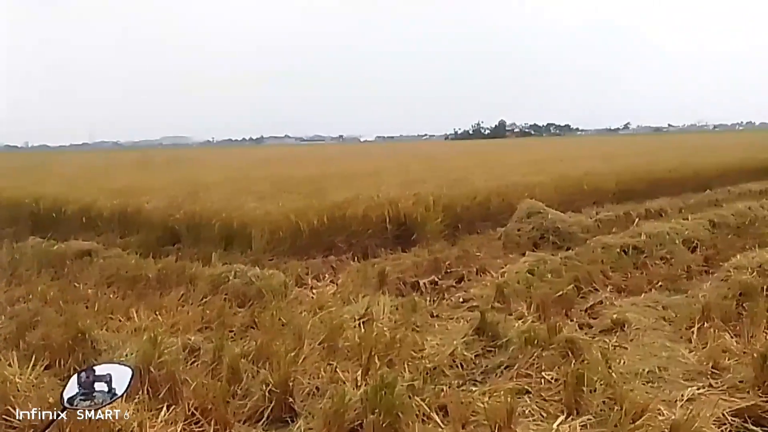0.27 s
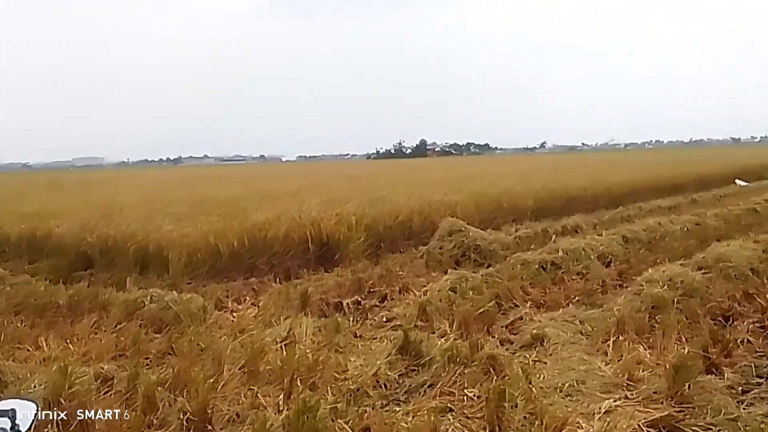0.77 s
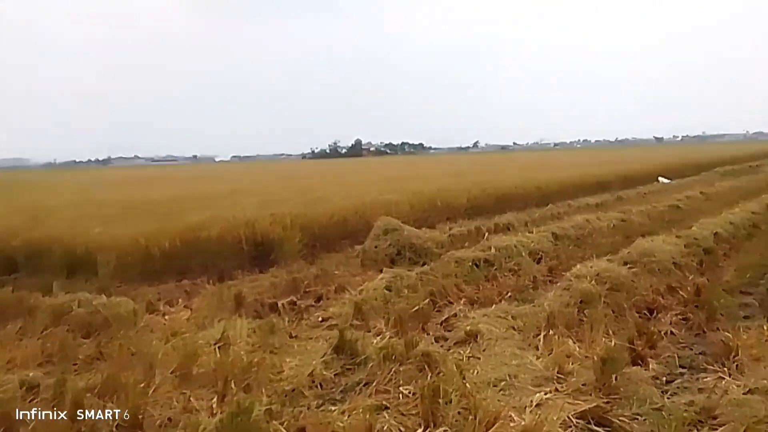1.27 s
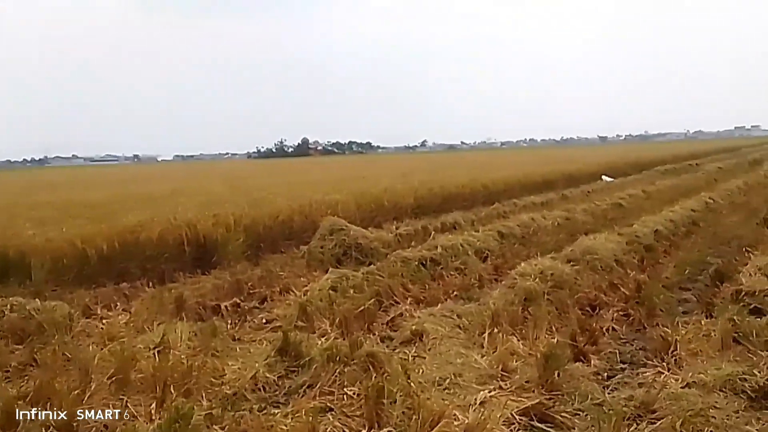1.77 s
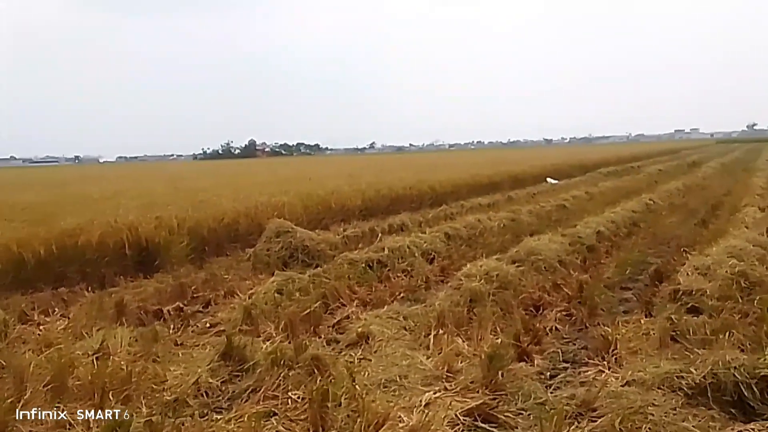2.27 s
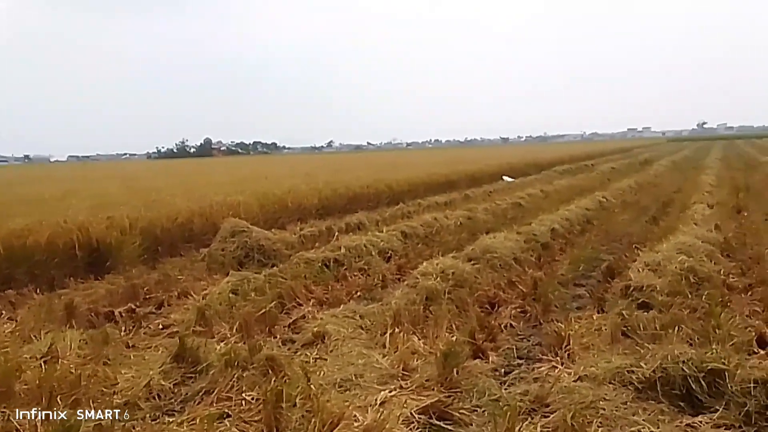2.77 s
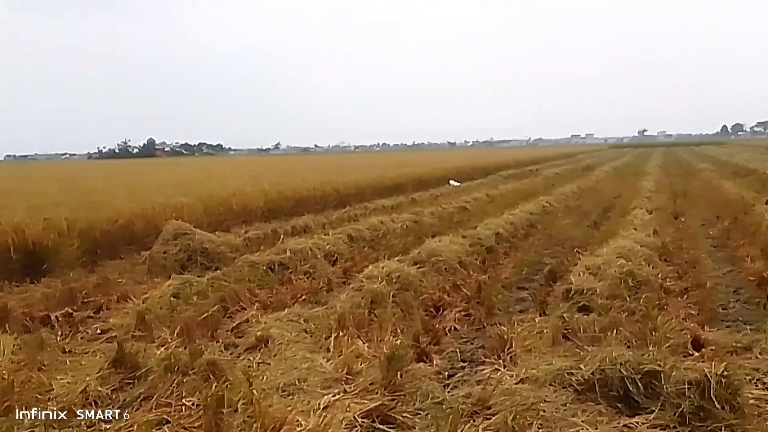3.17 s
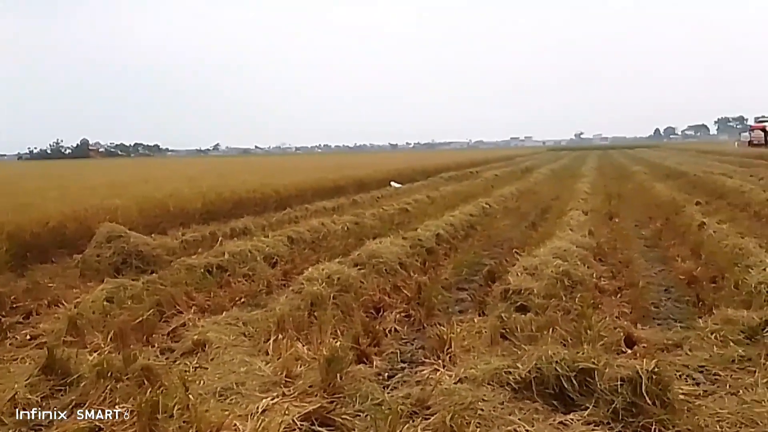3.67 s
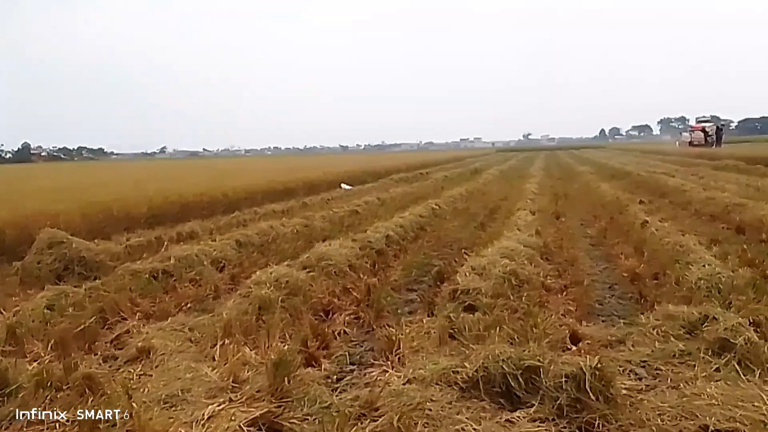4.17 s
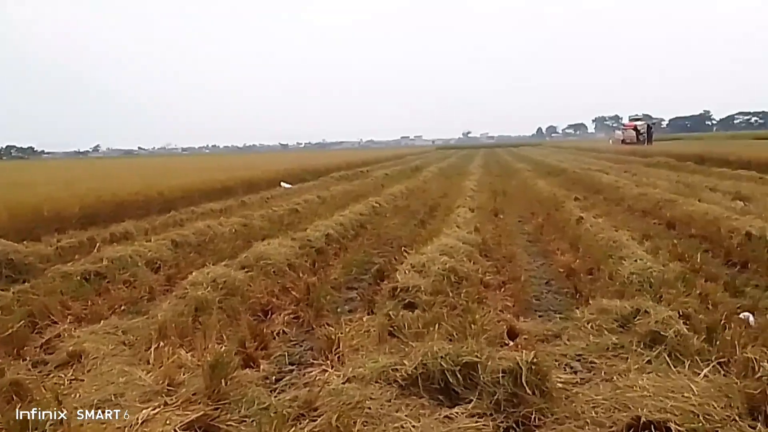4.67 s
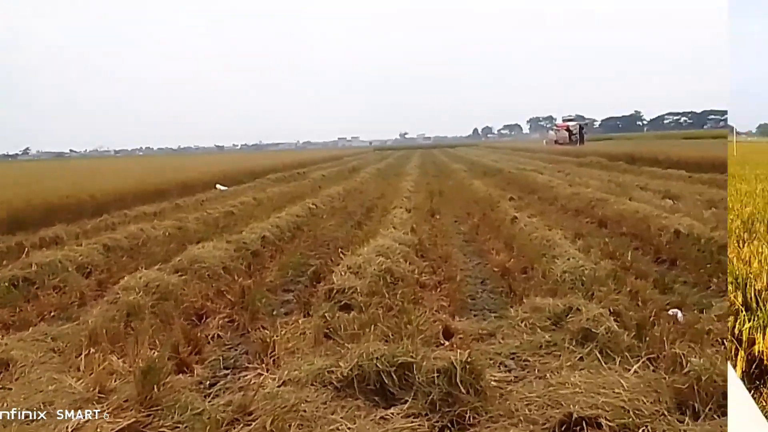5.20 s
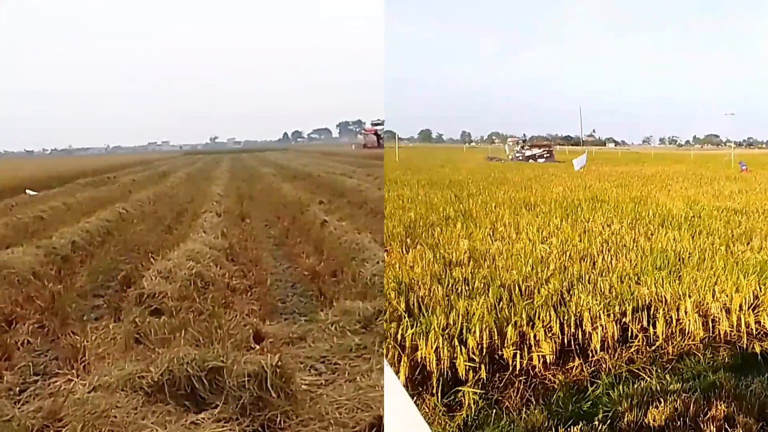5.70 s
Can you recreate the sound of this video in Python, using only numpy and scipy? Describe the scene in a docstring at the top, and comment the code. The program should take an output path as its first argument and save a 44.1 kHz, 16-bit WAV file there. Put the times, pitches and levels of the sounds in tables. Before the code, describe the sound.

In an open, echo-free rice field, a small single-cylinder engine, probably a motorbike's, putters close to the microphone at about 33 to 36 beats a second. From 0 to 1.5 seconds it is loudest: hollow low thumps with gas rasp, metallic clatter, sharp ticks and a ringing tin silencer, plus a few harder barks and brief clinks. Ticks thin out after about 1.6 seconds. From 3 seconds the engine slows and softens, its beats deeper, ragged and separate, dropping to around 20 a second after 4 seconds and 15 to 17 near the end, almost gone. A distant harvester's dull drone and thin hiss continue underneath, more exposed late, ebbing at the end. Tiny paired bird chips near 1.8, 3.1, 3.4, 4.1 and 5.5 to 5.8 seconds are very faint, as are brief high buzzy patches. A loose knock swells around 4.7. One dry close click lands at 5.2, then straw crackles from 5.4 to 5.75.

```python
"""A small single-cylinder engine, probably a motorbike's, putters in an open rice field and winds down towards idle.
From the start each firing rings the silencer, rasps, clatters and ticks, and a far combine harvester drones.
Early on some firings bark and a loose part clinks; the thump sinks in pitch and rings longer as the engine slows.
Later a bird chips in pairs, faint narrow patches of 8 kHz noise come and go and a slow knock swells;
then comes one dry click, and straw crackles. Impulse responses, shaped noise and decaying sines make the sounds."""
import sys
import numpy as np
from scipy import signal
from scipy.fft import rfft, irfft, next_fast_len
from scipy.io import wavfile
from scipy.ndimage import map_coordinates

SR = 44100
rng = np.random.default_rng(int(sys.argv[2]) if len(sys.argv) > 2 else 0)


def master_out(mix):
    """Clip the mix to full scale and print it as 16-bit PCM to the path in sys.argv[1]."""
    frames = np.transpose(np.atleast_2d(mix))
    ceiling = np.clip(frames, -1, 1)
    pcm = np.round(ceiling * 32767).astype(np.int16)
    wavfile.write(sys.argv[1], SR, pcm)


N = 261954

# Engine speed: time_s, firing_rate_hz
FIRING_RATE = [(0.0, 33.22), (0.15, 35.19), (0.44, 32.37), (0.72, 35.5), (0.79, 33.93), (1.17, 36.23),
               (1.54, 34.77), (1.83, 36.46), (2.16, 33.67), (2.48, 32.74), (2.74, 34.64), (2.95, 31.0),
               (3.06, 30.98), (3.37, 27.55), (3.55, 23.37), (3.75, 25.51), (3.98, 24.8), (4.21, 19.72),
               (4.61, 19.71), (4.91, 24.12), (5.15, 20.01), (5.68, 15.13), (5.94, 16.94)]
# Throttle: time_s, opening (2 pulling, 1 eased, 0 shut; more than 2 only strengthens the shell ring)
THROTTLE = [(0, 3.5), (1.2, 1), (1.9, 2), (2.9, 1.52), (3.35, 0.46), (4.45, 0.15), (4.85, 0.17),
            (5.2, 0.02), (5.94, 0.5)]
# Single firings that are weak or hard: time_s, strength_db
ODD_FIRINGS = [(0.05, -0.5), (0.164, 4.5), (0.195, -6), (0.252, 2.5), (0.39, -3.5), (0.668, 4), (0.783, 2),
               (1.068, 4), (1.2, -1.5), (1.292, 3), (1.32, -1.5), (1.404, 3), (1.433, -4), (2.0, 3.5),
               (2.05, -10), (2.262, 2.5), (2.322, -2), (2.35, 2), (2.6, -8), (3.22, -10), (3.325, 3.5),
               (3.48, -2.5), (3.52, -2.5), (3.76, -7), (3.8, 3), (3.92, -13), (4.135, -1.5), (4.23, 0),
               (4.63, -3), (4.685, 2), (4.73, 0.5), (5.23, 7), (5.335, -5), (5.39, 3.5), (5.44, 8.5),
               (5.5, -11), (5.88, 4)]

# Silencer response at each throttle setting: frequency_hz, relative_level_db
SILENCER_SHUT = [(30, -57), (60, -45), (100, -16), (135, -5), (168, -15.5), (205, -19.5), (245, 6.5),
                 (285, 0.5), (335, -32), (450, -49.5), (900, -61), (2000, -110)]
SILENCER_EASED = [(30, -76.5), (60, -53.5), (100, -26.5), (138, -14), (162, -20.5), (200, -9), (238, 5),
                  (272, -5.5), (305, 4.5), (340, -13), (400, -27), (700, -31.5), (2000, -100)]
SILENCER_PULLING = [(30, -46), (60, -43.5), (100, -24), (140, -17), (163, -21.5), (205, -3), (245, 1.5),
                    (275, -0.5), (315, 2.5), (350, -14), (400, -25.5), (700, -31.5), (2000, -100)]
# Drift of the silencer's resonances: time_s, pitch_factor
SILENCER_TUNING = [(0, 1.072), (1.1, 1.015), (2.4, 0.95), (3.2, 0.99), (3.5, 0.926), (4.3, 0.93), (4.85, 1),
                   (5.3, 0.994)]
# Silencer loudness before each layer's offset: time_s, level_db
THUMP_LEVEL = [(0.02, -38), (1.58, -40), (1.61, -43.5), (2.91, -45), (2.94, -48.5), (3.49, -45),
               (3.52, -53), (3.7, -48), (4.14, -49.5), (4.18, -60), (4.42, -52.5), (4.51, -74),
               (4.57, -56.5), (4.69, -51.5), (4.87, -48.5), (5.1, -55), (5.15, -67), (5.92, -69.5)]

# Gas rasp spectrum: frequency_hz, relative_density_db_per_hz
RASP_SPECTRUM = [(150, -38), (320, 6), (450, 1.5), (570, -1), (670, 9), (770, 0.5), (900, 0), (1030, -11),
                 (1200, -11.5), (1600, -40.5), (2500, -45)]
# Gas rasp loudness before its offset: time_s, level_db
RASP_LEVEL = [(0.02, -67), (0.15, -56), (0.56, -64.5), (0.76, -60.5), (1.75, -60.5), (2.12, -61),
              (2.45, -75.5), (2.57, -65.5), (3.21, -64), (3.4, -74.5), (4.92, -78.5), (5.89, -86),
              (5.92, -73)]
RASP_PITCH_FIRST, RASP_PITCH_LAST, RASP_SINK_S = 1.43, 1, 2.7  # pitch factors, and the time to sink
# Metal clatter spectrum: frequency_hz, relative_density_db_per_hz
CLATTER_SPECTRUM = [(900, -18), (1350, -9.5), (1650, -10.5), (1880, 1.5), (2030, 7.5), (2250, 4.5),
                    (2500, 5), (2750, 1.5), (3000, 1.5), (3250, -1), (3530, -2), (3820, -7), (4080, -8),
                    (5000, -25.5), (9000, -26.5)]
# Metal clatter loudness: time_s, level_db
CLATTER_LEVEL = [(0, -66), (0.25, -66.5), (0.5, -71), (0.72, -70), (0.88, -70), (1.05, -67), (1.2, -70.5),
                 (1.45, -68.5), (1.6, -70), (1.85, -67), (2.2, -70), (2.85, -73.5), (3.0, -76), (3.25, -74),
                 (3.55, -76), (3.9, -76.5), (4.3, -78.5), (4.8, -78), (5.2, -83.5), (5.94, -83)]
# Sharp tick spectrum: frequency_hz, relative_density_db_per_hz
TICK_SPECTRUM = [(1500, -9), (2600, -3.5), (3450, 5.5), (3850, -14), (4500, -4.5), (5150, -16.5),
                 (5800, -6), (6300, -4.5), (7050, 1), (8000, -4), (9000, -10.5), (9800, -11.5), (10600, -5),
                 (12500, -19), (15500, -29)]
# Tick loudness before its offset: time_s, level_db
TICK_LEVEL = [(0, -77), (0.22, -75.5), (0.25, -69.5), (0.45, -70), (0.72, -69), (0.86, -73), (0.94, -70.5),
              (1.05, -74.5), (1.27, -71.5), (1.4, -77), (1.49, -74), (1.53, -69), (1.6, -77), (1.66, -84),
              (1.72, -88), (1.84, -85), (1.93, -88), (1.98, -80), (2.03, -82), (2.08, -87), (2.18, -83),
              (2.265, -79.5), (2.32, -84), (2.36, -82.5), (2.5, -83), (2.57, -94), (2.66, -85), (2.78, -95),
              (2.84, -87), (2.95, -89), (3.08, -86), (3.13, -81.5), (3.19, -83), (3.26, -99)]
# Modes of the silencer's tin shell: frequency_hz, relative_level_db
SHELL_MODES = [(985, 0), (1197, -6), (1712, -5), (1813, -3), (2010, -9), (2471, -12), (3500, -12)]

# Far harvester and open air: frequency_hz, relative_density_db_per_hz
HARVESTER_SPECTRUM = [(25, -18), (55, -21), (115, 6), (170, 2), (240, 14), (380, -20), (560, -9),
                      (840, 3.5), (1060, -9), (1230, -9.5), (1520, -18.5), (1850, -8), (2200, -16.5),
                      (2600, -7), (2950, -12), (3200, -25.5), (3600, -24.5)]
# Harvester loudness before its drift and the air's absorption: time_s, level_db
HARVESTER_LEVEL = [(0, -67.5), (3.3, -64), (3.5, -66.5), (3.8, -64.5), (4.4, -65.5), (4.9, -63.5),
                   (5.15, -65.5), (5.35, -67.5), (5.55, -66.5), (5.85, -70.5)]
# Hiss loudness: time_s, level_db
HISS_LEVEL = [(0, -81.5), (3, -83.5), (5.1, -83.5), (5.5, -87), (5.94, -86)]

# Harder firings that bark: start_s, level_db
BARKS = [(0.109, -48), (0.165, -33.5), (0.251, -52), (0.67, -50), (0.697, -48), (0.784, -46.5),
         (0.927, -57), (1.069, -48), (1.096, -66), (1.406, -41), (1.433, -58)]
# Bark spectrum: frequency_hz, relative_density_db_per_hz
BARK_SPECTRUM = [(250, -12), (500, 11.5), (700, 4), (950, 8.5), (1250, 3), (1550, -6), (1800, -1),
                 (2600, -3), (3600, -6), (5000, -40), (12000, -63)]
# Clinks of a loose metal part: start_s, peak_db, pitch_hz
CLINKS = [(0.116, -44.5, 1000), (0.164, -38.5, 1200), (0.25, -42, 1130), (0.991, -50.5, 950),
          (1.098, -48.5, 1030), (1.405, -46, 810), (2.313, -53.5, 634)]
# Chips of a small far bird, in pairs: start_s, peak_db, pitch_hz
CHIPS = [(1.832, -75, 7950), (1.843, -74, 7640), (3.132, -76, 7640), (3.143, -72, 7450), (3.368, -79, 7700),
         (3.379, -78, 7850), (4.085, -81, 7750), (4.097, -77, 7600), (5.526, -80, 7350), (5.537, -82, 7150),
         (5.754, -81, 7270), (5.765, -78, 7010)]
# Faint narrow noise patches near 8 kHz: start_s, length_s, level_db
NOISE_PATCHES = [(3.41, 0.18, -93), (4.61, 0.23, -91), (4.935, 0.17, -90), (5.76, 0.19, -96)]
# Narrow noise band near 8150 Hz: frequency_hz, relative_density_db_per_hz
PATCH_SPECTRUM = [(7000, -62), (7850, -2), (8150, 9), (8450, -3), (8800, -2), (9600, -60)]

# Spells of loose knock at low speed: start_s, rise_s, fall_s, peak_db
KNOCK_SPELLS = [(4.45, 0.22, 0.57, -72), (4.8, 0.18, 0.17, -85), (5.5, 0.22, 1.8, -82)]
KNOCK_RANGE_DB = 25  # a spell rises from and sinks to this far under its peak
# Slow knock spectrum: frequency_hz, relative_density_db_per_hz
KNOCK_SPECTRUM = [(1500, -31), (3150, -16), (3370, 13.5), (3720, 1), (3860, 13), (4100, -12), (4400, 7),
                  (4950, -21), (5450, -5.5), (6000, -15), (7300, -5), (8500, -25), (11500, -13),
                  (15000, -18)]
# Dry click response: frequency_hz, relative_level_db
CLICK_RESPONSE = [(800, -22), (1600, -1), (2400, 6), (3000, -1.5), (3900, -17), (4800, -38), (12000, -43)]
# Crackles of dry straw: start_s, level_db
CRACKLES = [(5.435, -68), (5.468, -76), (5.52, -71), (5.569, -71), (5.589, -68), (5.622, -68), (5.657, -71),
            (5.717, -72), (5.734, -73)]
# Straw spectrum: frequency_hz, relative_density_db_per_hz
STRAW_SPECTRUM = [(1200, -30), (2000, -2), (2400, 2), (3000, -1), (4000, -10), (6000, -40)]

TOP_HZ = 15650  # upper band limit of the whole sound


def amp(db):
    """Decibel law: 20 dB is a factor of ten in amplitude."""
    return 10 ** (np.asarray(db) / 20)


def unit(x):
    """Normalisation: x at rms 1."""
    return x / np.sqrt(np.mean(x ** 2) + 1e-20)


def curve(rows):
    """Linear interpolation: one value per sample from (time, value) rows."""
    time_s, values = np.transpose(rows)
    return np.interp(np.arange(N) / SR, time_s, values)


def gain(points, size):
    """Frequency response: gain of (Hz, dB) points on an FFT grid, joined on a log axis."""
    hz, db = np.transpose(points)
    grid_hz = np.fft.rfftfreq(size, 1 / SR)
    return amp(np.interp(np.log(grid_hz + 1), np.log(hz), db))


def noise(points, patchy_db=0, size=5, count=20):
    """Spectral shaping: noise of rms 1 with shifting resonances, size bins wide and count frames long."""
    spectrum = signal.stft(rng.standard_normal(N), nperseg=2048)[2]
    smoother = np.outer(np.hanning(size), np.hanning(count))
    patches = unit(signal.fftconvolve(rng.standard_normal(spectrum.shape), smoother, "same"))
    spectrum = spectrum * gain(points, size=2048)[:, None] * amp(patchy_db * patches)
    return unit(signal.istft(spectrum, nperseg=2048)[1][:N])


def ring(points, swell=0, size=8192):
    """Impulse response of energy 1 centred on the blow: swell 0 is minimum phase, 1 zero phase."""
    cepstrum = irfft(np.log(gain(points, size) + 1e-7))
    # weighting the two halves of the cepstrum moves energy between after and before the blow
    cepstrum[1:size // 2] *= 2 - swell
    cepstrum[size // 2 + 1:] *= swell
    response = np.fft.fftshift(irfft(np.exp(rfft(cepstrum))))
    return response / np.linalg.norm(response)


def wobble(rate):
    """Slow random modulation: a smooth curve through rate random knots a second."""
    knots = rng.standard_normal(int(N * rate / SR) + 4)
    return map_coordinates(knots, [np.arange(N) * rate / SR])


def glide(x, speed):
    """Resampling: x played at a moving speed, so that its resonances slide."""
    return unit(map_coordinates(x, [np.cumsum(speed)], mode="wrap"))


def add(track, start, sound):
    """Superposition: mix a sound into the track from sample start on."""
    at = int(start) + np.arange(len(sound))
    inside = (at >= 0) & (at < N)
    track[at[inside]] += sound[inside]


def pings(rows, attack, decay, rough):
    """Damped oscillation: each short sound is one sine whose phase wanders slightly."""
    t, out = np.arange(SR // 20) / SR, np.zeros(N)
    envelope = (1 - np.exp(-t / attack)) ** 2 * np.exp(-t / decay)
    envelope = envelope / envelope.max()
    for start_s, peak_db, pitch_hz in rows:
        drift = rough * np.cumsum(rng.standard_normal(len(t)))
        add(out, start_s * SR, amp(peak_db) * envelope * np.sin(2 * np.pi * pitch_hz * t + drift))
    return out


def puffs(fires, decay, scatter_db, between, delay, force_db=0):
    """Amplitude modulation: a burst at each firing over a steady share between them, at rms 1."""
    t, envelope = np.arange(SR // 10) / SR, np.zeros(N)
    burst = np.exp(-t / decay) * (1 - np.exp(-t / 0.001))
    # the scatter also offsets all bursts against the steady share, by -3 times scatter_db on average
    size_db = force_db + scatter_db * (2 * rng.random(len(fires)) - 4.0)
    for start, size in zip(fires, amp(size_db)):
        add(envelope, start + delay * SR, size * burst)
    return unit(envelope + between)


def firings(rate):
    """Phase accumulation: a firing, as a sample index, at each whole cycle of the summed rate."""
    return np.flatnonzero(np.diff(np.floor(np.cumsum(rate) / SR + .4)))


def strengths(fires, scatter_db):
    """Cyclic variation of combustion: strengths in dB, nearly even, a few set weak or hard."""
    force_db = scatter_db * rng.standard_normal(len(fires))
    for time_s, db in ODD_FIRINGS:
        force_db[np.argmin(abs(fires - time_s * SR))] = db
    return force_db


def thumps(fires, rate, throttle, force_db, detune, lag):
    """Impulse excitation of a resonator: each firing rings the silencer, slightly varied in pitch."""
    voices = np.array([ring(SILENCER_SHUT, swell=0.36), ring(SILENCER_EASED, swell=0.061),
                       ring(SILENCER_PULLING, swell=0.11)])
    tuning = curve(SILENCER_TUNING)
    out, half = np.zeros(N), voices.shape[1] // 2
    n = np.arange(-half, half)
    for start, size_db, pitch in zip(fires, force_db, rng.standard_normal(len(fires))):
        # crossfade between the two nearest throttle settings
        distance = abs(np.clip(throttle[start], 0, 2) - np.arange(len(voices)))
        shares = np.maximum(1 - distance, 0)
        stretch = tuning[start] * (1 + detune * pitch)
        thump = map_coordinates(shares @ voices, [half + n * stretch])
        # slower firings each carry more of a second's energy
        energy = np.sqrt(SR / rate[start]) / np.linalg.norm(thump)
        # with the throttle shut the weak charge burns late
        late = lag * shares[0] - .0021
        add(out, start - half + late * SR, amp(size_db) * energy * thump)
    return out


def churn(thump_db):
    """Flow noise: turbulent gas keeps the silencer sounding between firings."""
    return amp(thump_db - 13) * noise(SILENCER_EASED)


def gas_rasp(fires, force_db):
    """Pulsed jet noise: gas rasps at each firing, its resonances sinking at first."""
    pitch = np.interp(np.arange(N) / SR, [0, RASP_SINK_S], [RASP_PITCH_FIRST, RASP_PITCH_LAST])
    gas = glide(noise(RASP_SPECTRUM, patchy_db=2.5, size=4, count=10), pitch)
    pulses = puffs(fires, decay=0.008, scatter_db=1.5, between=1.0, delay=0.00024,
                   force_db=1.9 * force_db)
    return amp(curve(RASP_LEVEL) + 0.13) * gas * pulses


def metal_clatter(fires, force_db):
    """Contact noise: many small metal contacts follow each firing."""
    contacts = amp(2.0 * wobble(350))
    metal = unit(noise(CLATTER_SPECTRUM, patchy_db=4.5, size=6) * contacts)
    pulses = puffs(fires, decay=0.0065, scatter_db=1.5, between=0.31, delay=0.0021,
                   force_db=1.04 * force_db)
    return amp(curve(CLATTER_LEVEL)) * metal * pulses


def sharp_tick(fires, force_db):
    """Short impact: a brief treble burst spreads over a wide band at each firing."""
    snap = noise(TICK_SPECTRUM, patchy_db=1.0, size=22, count=4)
    pulses = puffs(fires, decay=0.0021, scatter_db=3.0, between=0.013, delay=0.00078,
                   force_db=0.38 * force_db)
    return amp(curve(TICK_LEVEL) + 1.0) * snap * pulses


def shell_ring(fires, throttle, t60):
    """Modal vibration: firings shake the tin shell's modes at new strengths, loudest under load."""
    t, out = np.arange(SR // 2) / SR, np.zeros(N)
    modes = np.array([amp(db - 60 * t / t60) * np.sin(2 * np.pi * hz * t) for hz, db in SHELL_MODES])
    for start, mode_strengths in zip(fires, rng.standard_normal((len(fires), len(modes)))):
        add(out, start, mode_strengths @ modes)
    return amp(-100 + 10.2 * throttle) * unit(out)


def burble(fires, throttle, thump_db, force_db):
    """Noise excitation: off the throttle the charge burns raggedly and blurs each beat."""
    shut = np.clip(1 - throttle, 0, 1)
    pulses = puffs(fires, decay=0.012, scatter_db=1.0, between=0.35, delay=0.00045, force_db=force_db)
    flame = rng.standard_normal(N) * pulses
    return shut ** 2 * amp(thump_db - 6.5) * signal.fftconvolve(flame, ring(SILENCER_SHUT), "same")


def engine():
    """Periodic excitation: the crank times every layer of the engine."""
    rate, throttle, thump_db = curve(FIRING_RATE), curve(THROTTLE), curve(THUMP_LEVEL)
    fires = firings(rate)
    force_db = strengths(fires, scatter_db=1.2)  # a hard firing also rasps, clatters and ticks harder
    thump = thumps(fires, rate, throttle, force_db, detune=0.014, lag=0.0043)
    silencer = amp(thump_db - 2.07) * thump + churn(thump_db)
    silencer = silencer + burble(fires, throttle, thump_db, force_db)
    gas = gas_rasp(fires, force_db)
    metal = metal_clatter(fires, force_db) + sharp_tick(fires, force_db) + loose_knock(fires)
    return silencer + gas + metal + shell_ring(fires, throttle, t60=0.14)


def field():
    """Absorption over distance: the harvester's dulled drone drifts over a thin hiss; both ebb at the end."""
    air = signal.butter(4, 3900, fs=SR, output="sos")  # distance takes the treble
    far = signal.sosfilt(air, noise(HARVESTER_SPECTRUM, patchy_db=0.5, size=7))
    drone = amp(curve(HARVESTER_LEVEL) + 1.2 * wobble(5.9)) * far
    hiss = noise([(100, -2.0), (3500, -3.5), (5200, -8.0), (8000, -1.0), (12000, -1.5), (15500, -1.0)])
    return drone + amp(curve(HISS_LEVEL)) * hiss


def barks(decay, tail, tail_db):
    """Two-stage decay: a harder firing barks out of the pipe and leaves a short ring."""
    t, envelope = np.arange(SR // 10) / SR, np.zeros(N)
    decays = np.exp(-t / decay) + amp(tail_db) * np.exp(-t / tail)
    shape = decays * (1 - np.exp(-t / 0.0019))
    for start_s, level_db in BARKS:
        add(envelope, start_s * SR, amp(level_db) * shape)
    return envelope * noise(BARK_SPECTRUM)


def clinks():
    """Struck resonance: a loose metal part clinks as the engine shakes it."""
    return pings(CLINKS, attack=0.00094, decay=0.0025, rough=0.088)


def bird():
    """Tone bursts: a small far bird gives brief high chips in pairs."""
    return pings(CHIPS, attack=0.0018, decay=0.0014, rough=.1)


def noise_patches(pulse_hz):
    """Amplitude modulation: a fast regular pulsing roughens short, faint patches of narrow noise."""
    envelope = np.zeros(N)
    for start_s, length_s, level_db in NOISE_PATCHES:
        add(envelope, start_s * SR, amp(level_db) * signal.windows.tukey(int(length_s * SR), .3))
    pulses = unit(1 + np.sin(2 * np.pi * pulse_hz * np.arange(N) / SR))
    return envelope * pulses * noise(PATCH_SPECTRUM)


def loose_knock(fires):
    """Repeated impact: firings pulse a loose rattle in spells that swell and ebb."""
    spells = np.zeros(N)
    for start_s, rise, fall, peak_db in KNOCK_SPELLS:
        t = np.arange(int((rise + fall) * SR)) / SR
        under_peak = np.interp(t, [0, rise, rise + fall], [1, 0, 1])
        add(spells, start_s * SR, amp(peak_db - KNOCK_RANGE_DB * under_peak))
    rattle = noise(KNOCK_SPECTRUM, patchy_db=4.0, size=24, count=4)
    # the negative scatter lifts the bursts over the steady share
    return spells * rattle * puffs(fires, decay=0.0059, scatter_db=-0.5, between=0.03, delay=.0003)


def click(at, db):
    """Single impulse response: one small dry click close by."""
    out, tap = np.zeros(N), ring(CLICK_RESPONSE)
    add(out, at * SR - len(tap) // 2, amp(db) * tap)
    return out


def straw(decay, between):
    """Impulsive noise: dry straw rustles as a few crackles on a soft swish."""
    t, envelope = np.arange(SR // 10) / SR, np.zeros(N)
    shape = np.exp(-t / decay) + between * np.hanning(len(t))
    for start_s, level_db in CRACKLES:
        add(envelope, start_s * SR, amp(level_db) * shape)
    return envelope * noise(STRAW_SPECTRUM)


def scene():
    """Superposition in a free field: engine near, harvester far, and nothing echoes."""
    machines = engine() + field() + barks(decay=0.0031, tail=0.021, tail_db=-22) + clinks()
    faint_highs = bird() + noise_patches(pulse_hz=129)
    close_sounds = click(at=5.1905, db=-35) + straw(decay=0.0025, between=0.12)
    return (machines + faint_highs + close_sounds)[None]


def record(dry):
    """Ideal low-pass filtering: nothing passes at or above the band limit."""
    size = next_fast_len(N + SR // 4)
    passband = np.fft.rfftfreq(size, 1 / SR) < TOP_HZ
    return irfft(rfft(dry, size) * passband, size)[:, :N]


dry = scene()
out = record(dry)
master_out(out)
```